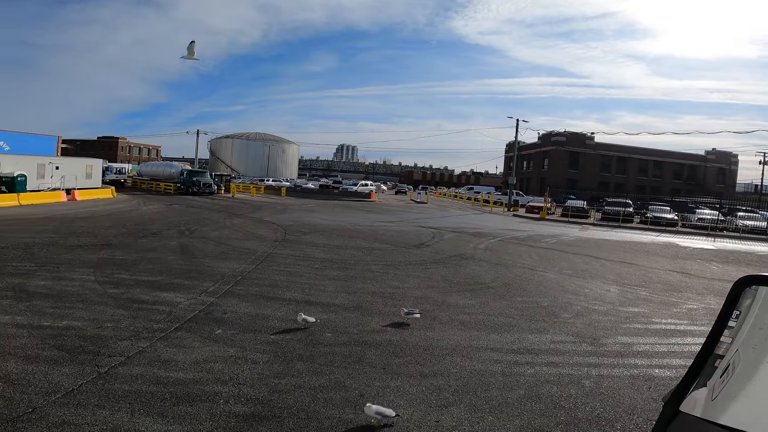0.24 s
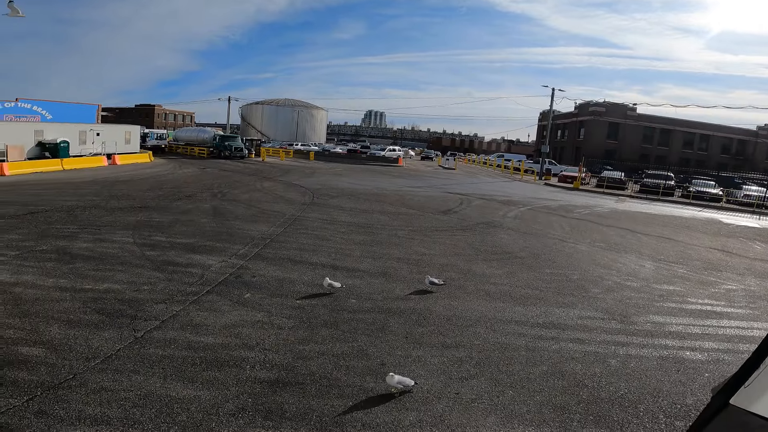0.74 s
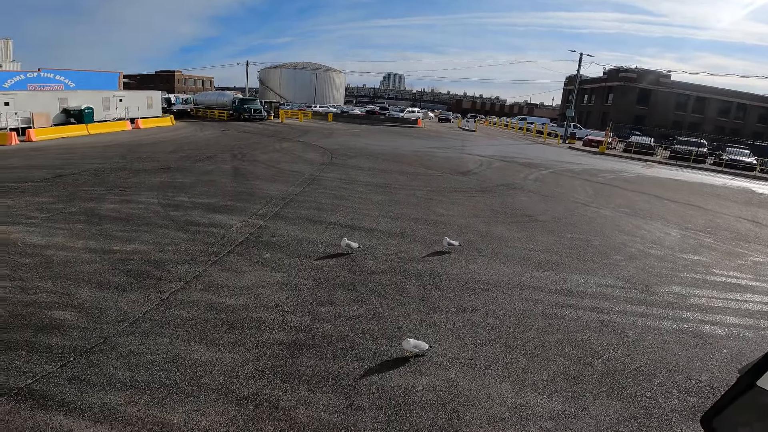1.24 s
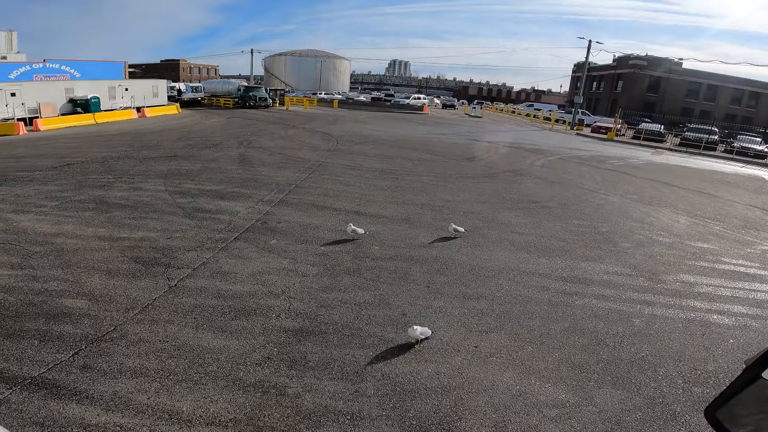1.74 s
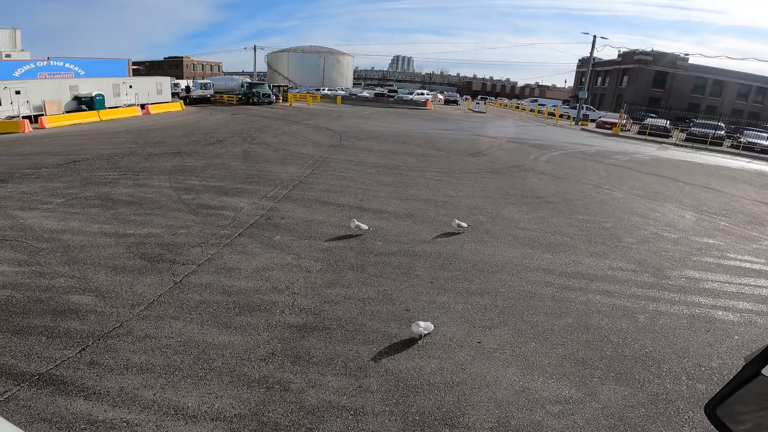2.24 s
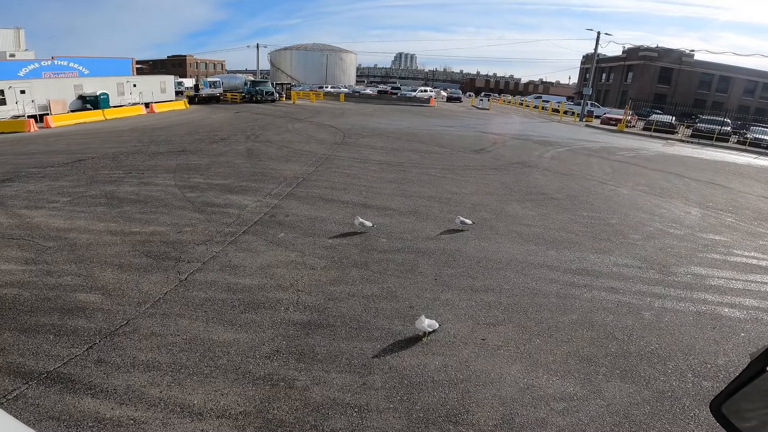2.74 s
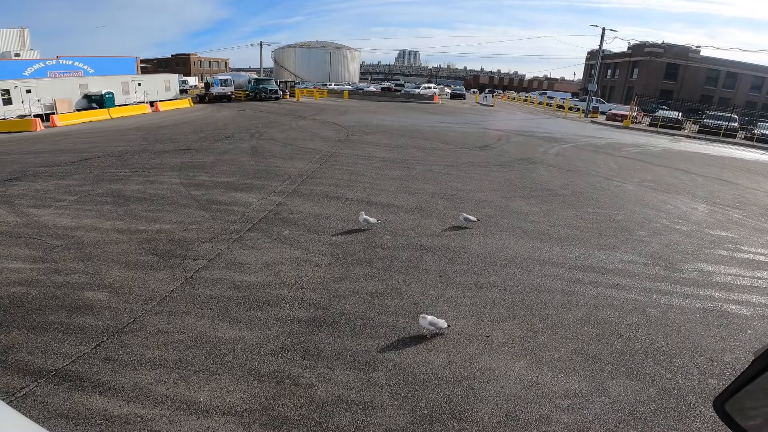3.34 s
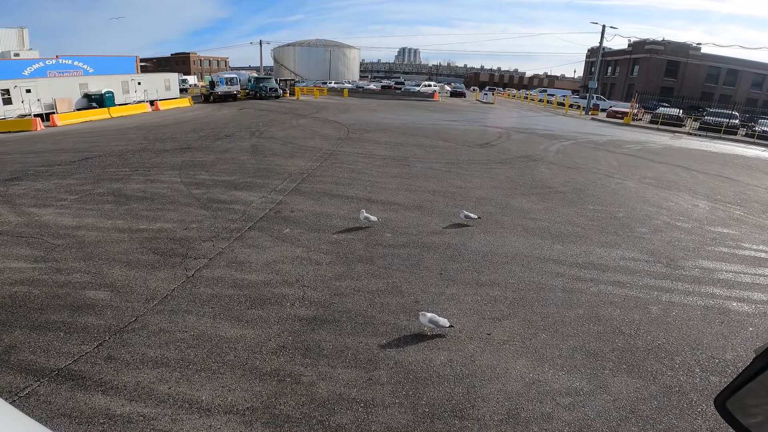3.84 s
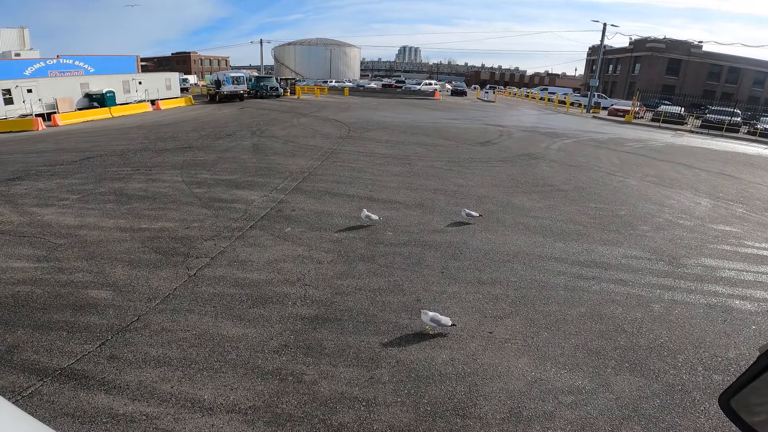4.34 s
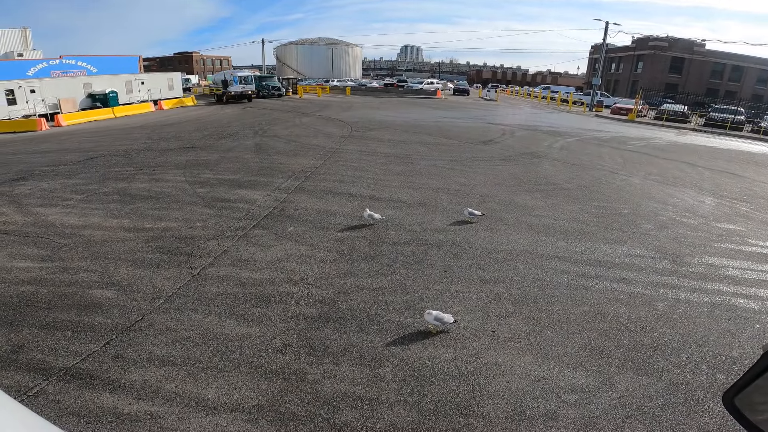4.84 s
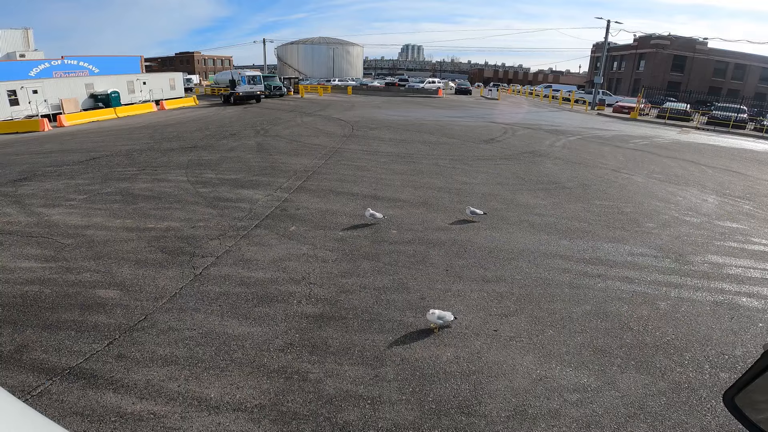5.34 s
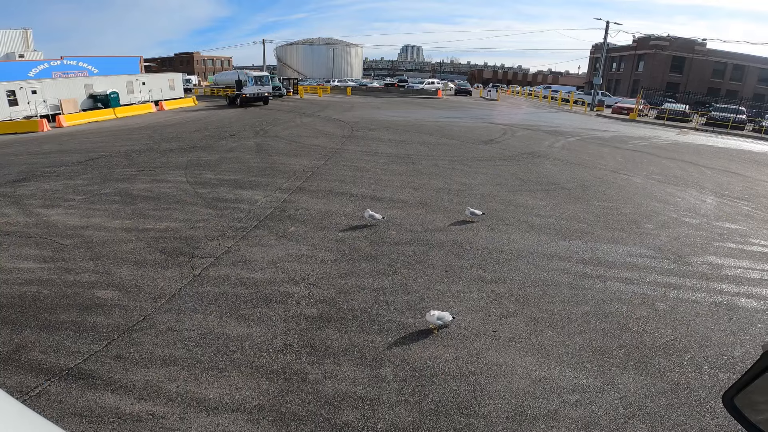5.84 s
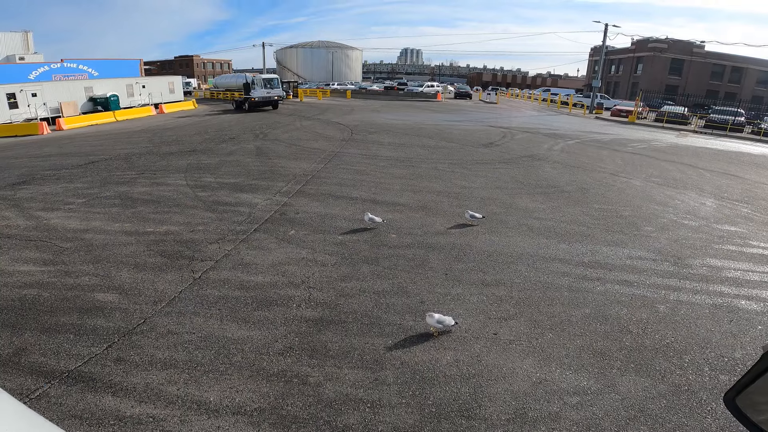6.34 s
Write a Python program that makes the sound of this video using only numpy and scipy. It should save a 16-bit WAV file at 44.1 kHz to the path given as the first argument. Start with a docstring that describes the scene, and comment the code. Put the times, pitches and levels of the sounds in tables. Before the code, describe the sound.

Gulls cry close by in an open paved yard while a diesel truck idles near the microphone. Two hoarse squawks come in quick succession, each breaking upward into a thin whistle, followed by two more widely spaced rising whistles. The gulls then stop and the engine carries on, with a low rumble, fan roar, light rattling and a faint high whine. Other motors hum further off.

```python
"""Gulls close by give four sharp cries: hoarse stacked notes that break upward into thin rising whistles.
Each note is a stack of overtones, roughened in the throat, coloured by the beak, bounced off the asphalt.
Behind them a six-cylinder diesel truck idles in a wide paved yard: its firings ring the block and rattle
the panels over exhaust rumble, fan roar and a thin turbo whine. Other motors hum further off."""
import sys
import numpy as np
from scipy import signal
from scipy.io import wavfile
from scipy.ndimage import map_coordinates

SR = 44100
rng = np.random.default_rng(int(sys.argv[2]) if len(sys.argv) > 2 else 0)


def digitize_waveform(pressure):
    """Quantize a signal to 16-bit integers and store it at the path in sys.argv[1].

    Rows of a 2-D input are taken as channels; values are limited to [-1, 1].
    """
    field = np.atleast_2d(pressure).T
    bounded = np.clip(field, -1, 1)
    quanta = np.round(bounded * 32767).astype(np.int16)
    wavfile.write(sys.argv[1], SR, quanta)


N = 290431
T = np.arange(N) / SR


def amp(db):
    """Decibels to gain."""
    return 10 ** (np.asarray(db) / 20)


def unit_rms(x):
    """Scale to unit power."""
    return x / np.sqrt(np.mean(x ** 2) + 1e-20)


def in_time(rows, t=T):
    """Columns of a curve table at times t."""
    s, *columns = np.transpose(rows)
    return [np.interp(t, s, c) for c in columns]


def at_hz(points, hz):
    """An EQ curve read on a log axis."""
    freqs, values = np.transpose(points)
    return np.interp(np.log(hz), np.log(freqs), values)


def drift(rate, size=N):
    """Smooth random wobble of spread about 1, changing rate times a second."""
    steps = rng.standard_normal(int(size / SR * rate) + 5)
    grid = np.arange(0, size / SR * rate + .2, .1)
    curve = map_coordinates(steps, [grid + 1], order=3)
    return np.interp(np.arange(size) * (rate / SR), grid, curve)


def resonate(x, modes):
    """Parallel resonances (Hz, width in Hz, dB) with alternating sign."""
    out = 0
    for k, (hz, width, db) in enumerate(modes):
        r = np.exp(-np.pi * width / SR)
        poles = [1, -2 * r * np.cos(2 * np.pi * hz / SR), r * r]
        out = out + (-1) ** k * amp(db) * signal.lfilter([1 - r * r, 0, r * r - 1], poles, x)
    return out


# Width of the fully open image. Each row: frequency in Hz, side over mid in dB.
SIDE_EQ = [(60, -30.5), (150, -28), (370, -19), (930, -5), (2320, -3.5), (5790, -5), (8000, -1),
           (9800, -13), (12000, 4), (14000, 0)]
# Its lean to the left. Each row: frequency in Hz, left over right in dB.
LEFT_LEAN = [(60, 0), (300, .2), (540, 1.8), (1610, 3), (3000, 4.5), (4820, 3.6), (8000, 2.6), (12000, .6)]
# The image opens over time. Each row: time in seconds, side fader in dB.
WIDTH_RIDE = [(0, -41), (1.1, -65), (1.45, -33), (2.6, -17), (3.5, -13.5)]
# How far each range follows that fader. Each row: frequency in Hz, multiplier on its dB.
WIDTH_DEPTH = [(250, 0.0067), (550, 0.1), (1300, 0.62), (7000, 0.21), (9500, 1.1), (11500, -0.19)]


def spread(mid, side, hz):
    """Place a sound of this pitch left and right in the opening stereo image."""
    lean = np.tanh(at_hz(LEFT_LEAN, hz) * np.log(10) / 40)   # mid fed into the side pans it
    side = amp(at_hz(SIDE_EQ, hz)) * side + lean * mid
    side = side * amp(at_hz(WIDTH_DEPTH, hz) * in_time(WIDTH_RIDE)[0])
    return np.array([mid + side, mid - side])


def hum(hz, db):
    """A sine of steady pitch that wavers a little in level."""
    level = amp(db + 3 + .9 * drift(2.53))   # 3 dB from rms to peak
    return level * spread(np.sin(2 * np.pi * (hz * T + rng.random())), 0, hz)


# The bed of far motors. Each row: pitch in Hz, level in dB.
MOTOR_HUMS = [(42.65, -44), (49.37, -33), (55.68, -43), (117.76, -38.5), (897, -51)]


def far_motors():
    """Other motors in the yard hold steady notes."""
    return sum(hum(hz, db) for hz, db in MOTOR_HUMS)


# Two low swells. Each row: start and length in seconds, first and last pitch in Hz, level in dB.
HUM_SLIDES = [(0.68, 0.646, 157.9, 147, -32.5), (4.556, 0.335, 153.8, 146, -31)]


def sliding_hum():
    """A hum near 150 Hz swells, slides down and fades."""
    out = 0
    for start, length, start_hz, end_hz, db in HUM_SLIDES:
        progress = np.clip((T - start) / length, 0, 1)
        phase = np.cumsum(start_hz + (end_hz - start_hz) * progress) * (2 * np.pi / SR)
        out = out + amp(db) * 2 * np.sin(np.pi * progress) * np.sin(phase)
    return out


# Fader ride of the turbo. Each row: time in seconds, level in dB.
TURBO_RIDE = [(0, -67), (.9, -68), (1.3, -58.5), (2.3, -55.5), (2.9, -58), (3.6, -51.5), (4.3, -57.5),
              (4.9, -54.5), (5.48, -60), (6.07, -55), (6.29, -62), (6.5, -55)]


def turbo(whine_hz=6435):
    """The turbo spins with a thin, flickering whine."""
    phase = np.cumsum(whine_hz + 5.3 * drift(20)) * (2 * np.pi / SR)
    level = amp(in_time(TURBO_RIDE)[0] + 3 + 1.2 * drift(25))
    return level * spread(np.sin(phase), 0, whine_hz)


CYCLE_HZ, FIRST_FIRING_S = 5.415, 0.0284   # all six cylinders fire once a cycle
# The exhaust's chord. Each row: multiple of the engine cycle, level in dB.
EXHAUST_ORDERS = [(6, -38.5), (11, -45), (12, -33), (15, -40), (18, -38), (27, -43.5), (30, -41),
                  (39, -51.5), (42, -52), (72, -45)]


def exhaust():
    """The exhaust drones on harmonics of the engine cycle."""
    return sum(hum(order * CYCLE_HZ, db) for order, db in EXHAUST_ORDERS)


# The idle's accents, cylinder by cylinder. Each row: block ring in dB, broad clatter in dB.
CYLINDER_ACCENTS = [(2.5, -3), (0.5, 5), (0.5, 8.5), (-6, -29), (-5, 18), (1, 5.5)]
RING, CLATTER = 0, 1


def firings(column, decay_s, vary_db):
    """Envelope of the knocks: a quick rise at each firing, each cylinder with its own force."""
    count = int(N / SR * CYCLE_HZ * 6)
    timing, force = rng.standard_normal((count, 2)).T
    times = FIRST_FIRING_S + np.arange(count) / CYCLE_HZ / 6 + 0.0014 * timing
    accents_db = np.resize(np.array(CYLINDER_ACCENTS)[:, column], count)
    clicks = np.zeros(N + SR)
    clicks[(times * SR).astype(int)] = amp(accents_db + vary_db * np.clip(force, -1.5, 1.5))
    tails = signal.lfilter([1], [1, -np.exp(-1 / (decay_s * SR))], clicks)
    return unit_rms(signal.lfilter([1], [1, -.985], tails)[:N])   # rise of a ms or two


# Noise faders; only the moves about each average count.
# Each row: time in seconds, then rumble, drone, roar and hiss in dB.
NOISE_RIDES = [(0.0, -34.5, -33, -29.5, -51.5), (1.1, -33, -34.5, -30, -52), (2.0, -32, -38.5, -31, -51.5),
               (3.94, -33, -38.5, -31.5, -50.5), (4.7, -31.5, -36, -30, -50.5),
               (5.5, -30.5, -38.5, -30.5, -49.5), (6.2, -31, -35, -29, -50),
               (6.59, -30.5, -34.5, -28, -49.5)]
# The higher hiss swells more. Each row: frequency in Hz, multiplier on the fader's dB.
SWELL_DEPTH = [(3500, 1), (5000, 3.07), (9000, 3.5)]
# The dark tilt of the noise. Each row: frequency in Hz, relative density in dB.
NOISE_EQ = [(15, -6.5), (55, -2), (90, -6), (151, -4), (254, -10), (500, -16), (1000, -19.5), (1900, -26.5),
            (3000, -35), (5000, -39), (7000, -44.5), (9500, -62.5), (12000, -54), (14500, -82)]


def engine_noise(clatter):
    """Exhaust rumble, fan roar and air hiss in third-octave bands; the firings pulse them lightly."""
    rides = [ride - ride.mean() for ride in in_time(NOISE_RIDES)]
    white = rng.standard_normal((2, 2, N))
    edges = 15 * 2 ** (np.arange(31) / 3)
    out = 0
    for k, (low, high) in enumerate(zip(edges, edges[1:])):
        hz = np.sqrt(low * high)
        band = signal.butter(2, [low, high], "band", fs=SR, output="sos")
        mid, side = signal.sosfilt(band, white[k % 2])
        ride = rides[np.searchsorted([190, 300, 1500], hz)]   # crossovers in Hz
        swell_db = ride * (hz > 100) * at_hz(SWELL_DEPTH, hz) + 0.4 * drift(3.015) + 0.7 * drift(14)
        pulse = 1 + at_hz([(200, 0.056), (1200, 0.12), (8000, 0.03)], hz) * (clatter - 1)
        out = out + amp(at_hz(NOISE_EQ, hz) + swell_db) * pulse * spread(mid, side, hz)
    return amp(-25) * unit_rms(out)


# The ring of the panels. Each row: pitch in Hz, width in Hz, relative level in dB.
PANEL_MODES = [(150.3, 24, 0.5), (325.3, 19.8, 4.5), (517.6, 15, 2.5), (538, 25, 2), (905, 5.7, -3),
               (923, 16, -11.5), (968, 18, -4), (1191, 13, -5), (1228, 6.8, -6), (1396.5, 23, -7.5),
               (1659, 8, -5)]


def panels(clatter):
    """The truck's panels ring under steady shaking, a little harder at each firing."""
    shaking = rng.standard_normal((2, N)) * (4 + clatter)
    out = 0
    for k, mode in enumerate(PANEL_MODES):
        mid, side = resonate(shaking, [mode])
        out = out + (-1) ** k * spread(mid, side, mode[0])
    return amp(-34) * unit_rms(out)


# The bright ring of the block. Each row: pitch in Hz, width in Hz, relative level in dB.
BLOCK_MODES = [(3325, 70, 14), (3627, 130, 15), (5100, 390, -4)]
# Fader ride of the knock. Each row: time in seconds, level in dB.
KNOCK_RIDE = [(0, -54.5), (1.5, -51), (4.6, -50.5), (5.7, -45), (6.59, -51.5)]
BLOCK_HZ = 3600


def knock():
    """Each firing rings the engine block briefly."""
    bursts = firings(RING, decay_s=0.017, vary_db=3) * rng.standard_normal((2, N))
    focused = resonate(bursts, [(BLOCK_HZ, 510, 0)])
    mid, side = resonate(focused, BLOCK_MODES)
    return amp(in_time(KNOCK_RIDE)[0]) * unit_rms(spread(mid, side, BLOCK_HZ))


# Chirps that poke out of the knock. Each row: start in seconds, level at the crest in dB.
CHIRP_CUES = [(4.89, -48), (5.255, -43), (5.621, -40.5), (5.755, -44), (5.90, -55), (5.995, -45)]


def chirps(decay_s=0.0085):
    """Short swells of noise ring narrowly near the block's pitch."""
    envelope = 0
    for start, db in CHIRP_CUES:
        age = np.clip(T - start, 0, None) / decay_s
        envelope = envelope + amp(db) * age * np.exp(1 - age)
    focused = resonate(rng.standard_normal(N), [(BLOCK_HZ, 550, 0)])
    ring = unit_rms(resonate(focused, [(3580, 190, 0)]))
    return envelope * spread(ring, 0, BLOCK_HZ)


# The gulls' ground reflection. Each row: time in seconds, delay in milliseconds.
BOUNCE_DELAY = [(1.7, 3.59), (2.6, 3.52)]


def asphalt_bounce(direct, start_s, bounce_db=-13):
    """A late copy off the asphalt notches the notes as they glide."""
    lag = int(in_time(BOUNCE_DELAY, start_s)[0] * SR / 1000)
    return (direct + amp(bounce_db) * np.roll(direct, lag)) / np.hypot(1, amp(bounce_db))


# Timbre. Each voice: relative overtone levels in dB, from the first above BEAK_LOW_HZ upward.
VOICE_OVERTONES = {"squawk": (-6, -2.5, -12.5, -10.5, -17.5, -35),
                   "rasp": (-6.5, 0, -17.5, -20, -24.5, -20), "croak": (-13, 1, -11, -20, -25, -27, -18),
                   "bark": (-17, -0.5, -1, -14, -17, -21), "yelp": (2, 0, -9, -45, -41),
                   "whistle": (-1, -9, -29, -34)}
# The throat reshapes. Each voice: change over the note in dB for each overtone above the lowest.
THROAT_MOVES = {"squawk": (0, 0, -5, 1, -3), "rasp": (-12, 9, -3, 8, -3), "bark": (0, -10, -12, -3, -4),
                "whistle": (-9, -9, -6)}
# The beak cavity colours the gliding overtones. Each row: frequency in Hz, gain in dB.
BEAK_EQ = [(5500, 7), (6100, -11), (6700, 2), (7400, -8), (9800, 4), (10500, 5), (11000, 6), (11600, -9),
           (13500, 5)]
BEAK_LOW_HZ, FUNDAMENTAL_DB = 1400, -10


def overtone_stack(voice, hz, hoarse, treble_db, low_fade_db):
    """A gull's harmonics; hoarseness shakes pitch and level and weakens every second cycle."""
    size = len(hz)
    wobble = 1 + .035 * hoarse ** 1.5 * drift(700, size) + .003 * drift(70, size)
    phase = np.cumsum(hz * wobble) * (2 * np.pi / SR)
    first = np.ceil(BEAK_LOW_HZ / hz[0])
    stack = amp(FUNDAMENTAL_DB) * (first > 1) * np.sin(phase)   # faint root under the low voices
    moves_db = (low_fade_db, *THROAT_MOVES.get(voice, np.zeros(len(VOICE_OVERTONES[voice]))))
    treble_shelf = [(3800, 0), (4000, 1), (8000, 1), (9000, .5), (12000, .2)]   # Hz, share of treble_db
    for k, tone_db in enumerate(VOICE_OVERTONES[voice]):
        harmonic = first + k
        flutter_db = (4.5 * hoarse + .3 * k) * drift(260, size)
        throat_db = moves_db[k] * np.linspace(0, 1, size)
        shelf_db = treble_db * (k > 0) * at_hz(treble_shelf, harmonic * hz.mean())
        beak_db = at_hz(BEAK_EQ, harmonic * hz)
        stack = stack + amp(tone_db + flutter_db + throat_db + shelf_db + beak_db) * np.sin(harmonic * phase)
    growl = 1 + .6 * hoarse ** 2 * np.sin(phase / 2)
    return unit_rms(stack) * (1 - .35 * hoarse ** 2) * growl


# Grit. Each voice: hoarseness at start and end (0 is clear, 1 rasps, more breaks into noise).
HOARSENESS = {"squawk": (.4, .55), "rasp": (1.25, .3), "croak": (.45, .45), "bark": (.28, .25),
              "yelp": (.25, .5), "whistle": (.2, .2)}
ATTACK_S, RELEASE_S, BREATH_DB = .015, .008, -9.5


def gull_note(curve, voice, treble_db, low_fade_db):
    """One note along a curve of pitch and level: overtones plus air that grows with hoarseness."""
    start = int((curve[0][0] - .007) * SR)
    size = int((curve[-1][0] - curve[0][0] + .010) * SR)
    t = T[start:start + size]
    hz, db = in_time(curve, t)
    hoarse = np.geomspace(*HOARSENESS[voice], size)
    stack = overtone_stack(voice, hz, hoarse, treble_db, low_fade_db)
    formants = [(2170, 590, 11), (3480, 1450, 3), (4900, 780, -9), (11500, 3000, -27)]
    breath = unit_rms(resonate(rng.standard_normal(size), formants))
    envelope = np.clip(np.minimum((t - t[0]) / ATTACK_S, (t[-1] - t) / RELEASE_S), 0, 1) ** 1.5
    out = np.zeros(N)
    out[start:start + size] = amp(db) * envelope * (stack + hoarse * amp(BREATH_DB) * breath)
    return asphalt_bounce(out, t[0])


# Four rising whistles and the last one's falling tail, a curve each.
# Each row: time in seconds, pitch in Hz, level in dB.
WHISTLE_CURVES = [
    [(0.204, 3090, -31), (0.21, 3060, -29), (0.222, 3060, -30), (0.232, 3170, -28), (0.246, 3200, -38),
     (0.262, 3270, -26), (0.282, 3376, -33), (0.293, 3400, -38)],
    [(0.728, 3090, -30), (0.738, 3085, -27), (0.768, 3225, -35), (0.782, 3255, -27), (0.8, 3313, -30),
     (0.805, 3315, -36)],
    [(1.418, 3000, -35), (1.464, 3144, -26.5), (1.532, 3496, -35.5), (1.552, 3576, -31), (1.602, 3640, -33),
     (1.616, 3570, -35), (1.64, 3480, -44)],
    [(2.724, 3220, -26), (2.736, 3227, -23), (2.768, 3265, -28), (2.804, 3377, -26), (2.824, 3505, -35),
     (2.852, 3630, -31), (2.922, 3850, -33), (2.95, 3885, -36)],
    [(2.952, 3270, -36), (2.962, 3190, -32), (2.982, 3130, -39), (3.036, 3030, -44)],
]
# Brightness of those curves: one treble trim in dB for each.
WHISTLE_TRIMS = (-7, -8, 4.5, 5, -5)
# The short notes. Each row: voice, start and length in seconds, first and last pitch in Hz,
# then level, level change, treble trim and the lowest overtone's change, all in dB.
GULL_CUES = [ ("squawk", 0.073, 0.047, 860, 790, -23, -2, -7, -16),
             ("rasp", 0.119, 0.058, 740, 782, -20.5, -2, -1, 2),
             ("croak", 0.181, .025, 545, 554, -24, 0, -4, 0),
             ("bark", 0.272, 0.028, 825, 850, -31, 4, 1, 0),
             ("yelp", 0.299, 0.028, 2330, 2280, -26, -5, -2, -12),
             ("rasp", 0.318, 0.035, 575, 510, -30, 0, -8, -6),
             ("squawk", 0.6, 0.052, 882, 818, -21, -2, 3, 2),
             ("rasp", 0.649, 0.055, 760, 792, -21, -2, 0, 8),
             ("croak", 0.706, .022, 538, 554, -23.5, -2, -6, 0),
             ("bark", 0.801, 0.051, 830, 874, -30.5, 1, -3, 0),
             ("yelp", 0.849, .028, 2380, 2200, -25, -11, -15, -18),
             ("rasp", 0.862, .03, 575, 520, -32, -3, -12, -4),
             ("squawk", 1.339, .034, 800, 790, -35, 10, -10, -15),
             ("yelp", 1.374, .035, 1715, 1680, -21, -9, -3, -2),
             ("whistle", 2.69, .035, 2900, 3040, -39, 11, -25, 0),
             ("whistle", 3.445, .075, 4200, 3590, -52, 1, -9, 0)]
# Scoop. Each voice: share by which the pitch sags at mid-note.
PITCH_SAG = {"squawk": 0.014, "rasp": 0.03}
# As the stereo image opens, the cries shift from the centre slightly to the right.
# Each row: time in seconds, left-side lag in microseconds.
IMAGE_LAG = [(1.0, 0), (1.4, 8), (2.75, 16), (2.9, 26)]


def gulls():
    """Gulls cry in short gliding notes and thin rising whistles."""
    cries = sum(gull_note(curve, "whistle", db, 0) for curve, db in zip(WHISTLE_CURVES, WHISTLE_TRIMS))
    for voice, start, length, start_hz, end_hz, db, fade_db, treble_db, low_fade_db in GULL_CUES:
        middle_hz = (start_hz + end_hz) / 2 * (1 - PITCH_SAG.get(voice, 0))
        curve = [(start, start_hz, db), (start + length / 2, middle_hz, db + fade_db / 2),
                 (start + length, end_hz, db + fade_db)]
        cries = cries + gull_note(curve, voice, treble_db, low_fade_db)
    lag = in_time(IMAGE_LAG)[0] * SR / 10 ** 6
    shift = np.gradient(cries) * lag / 2   # the slope gives a delay of part of a sample
    return np.array([cries - shift, cries + shift])


def scene():
    """Gulls over the idling truck and the hums of the yard."""
    cries = gulls()
    clatter = firings(CLATTER, decay_s=0.028, vary_db=5.5)
    engine = engine_noise(clatter) + panels(clatter) + knock() + exhaust()
    return far_motors() + sliding_hum() + turbo() + engine + chirps() + cries


def record(dry):
    """A steep low-pass removes everything above 15.1 kHz."""
    return signal.sosfilt(signal.cheby2(12, 70, 15100, fs=SR, output="sos"), dry)


dry = scene()
out = record(dry)
digitize_waveform(out)
```